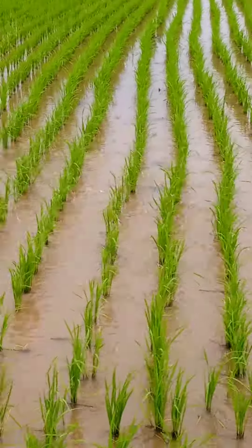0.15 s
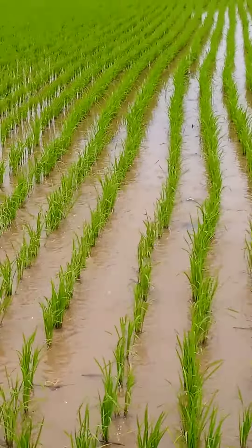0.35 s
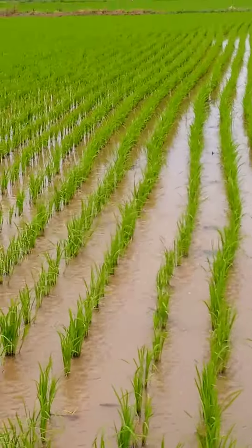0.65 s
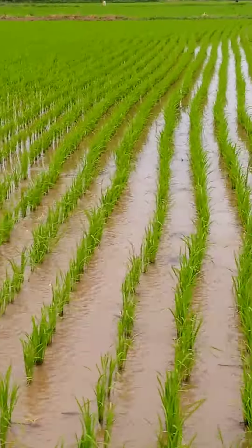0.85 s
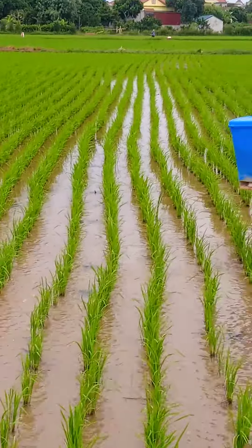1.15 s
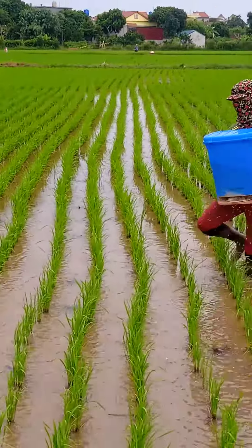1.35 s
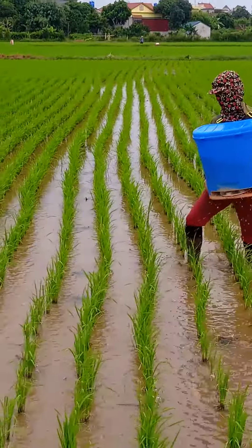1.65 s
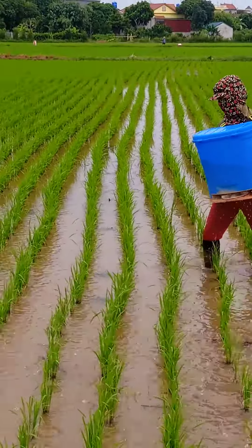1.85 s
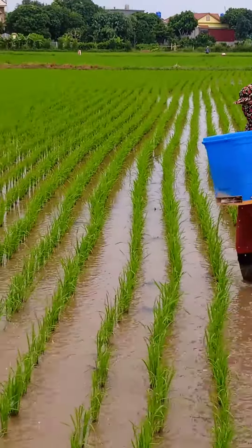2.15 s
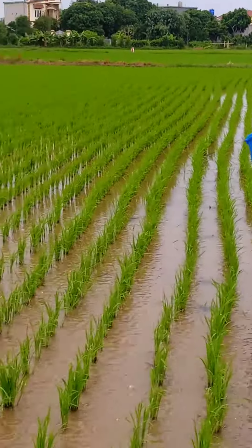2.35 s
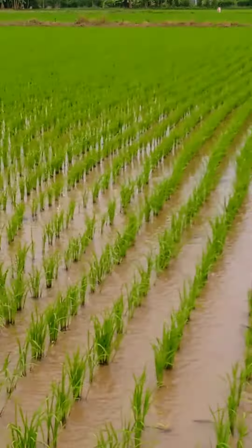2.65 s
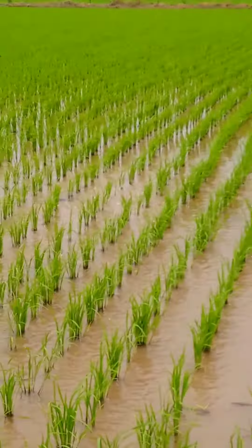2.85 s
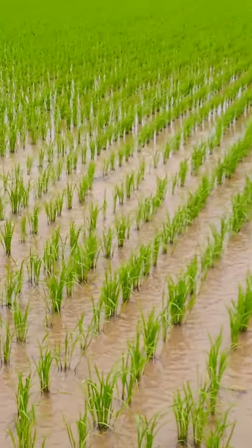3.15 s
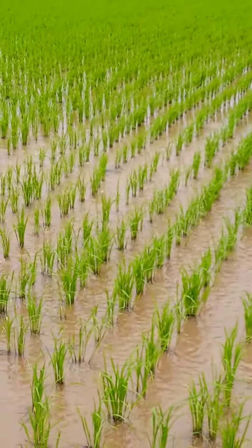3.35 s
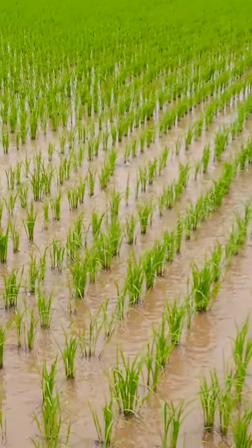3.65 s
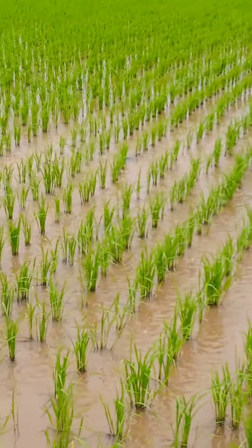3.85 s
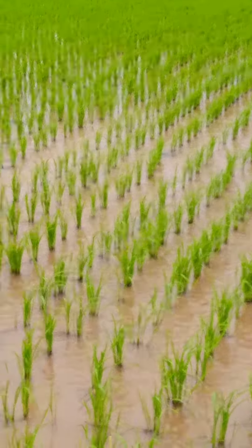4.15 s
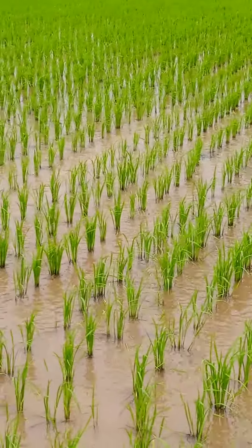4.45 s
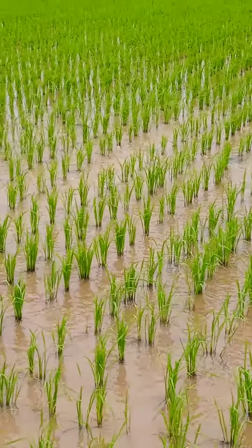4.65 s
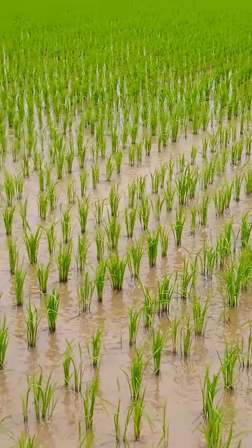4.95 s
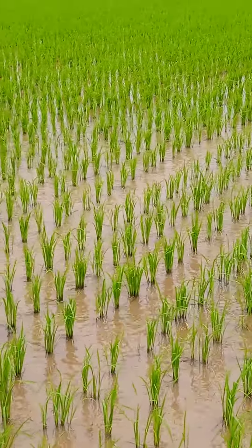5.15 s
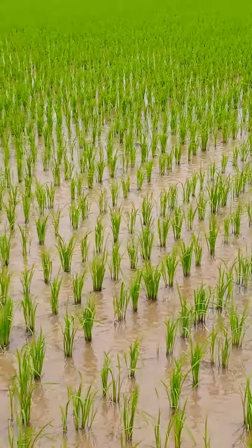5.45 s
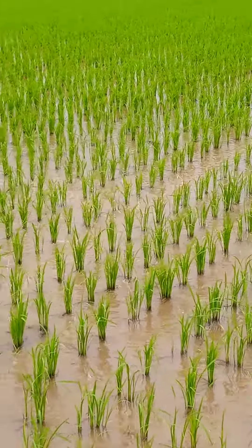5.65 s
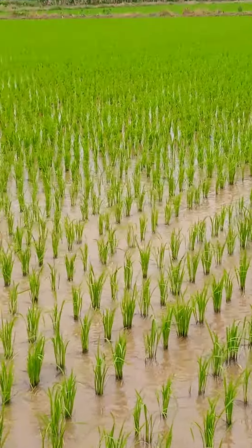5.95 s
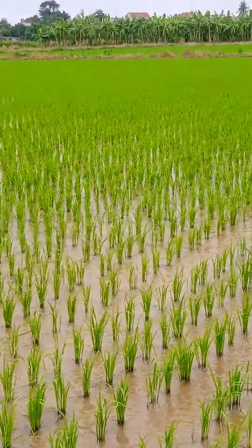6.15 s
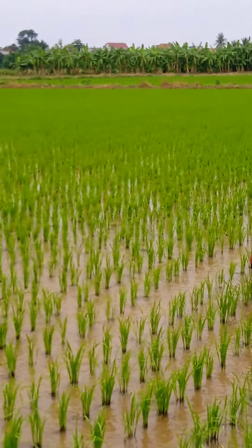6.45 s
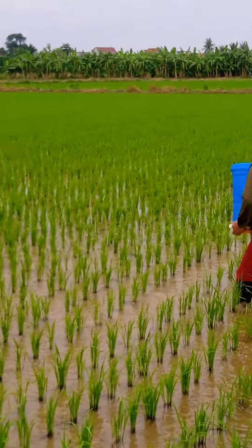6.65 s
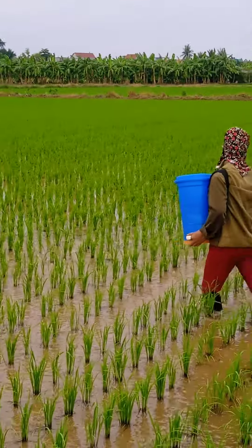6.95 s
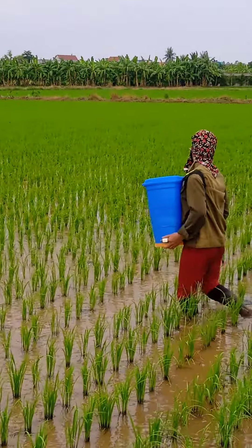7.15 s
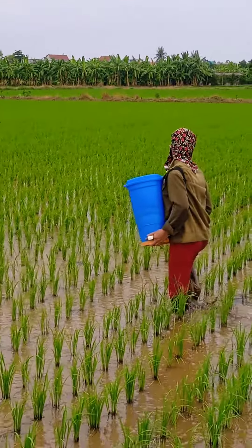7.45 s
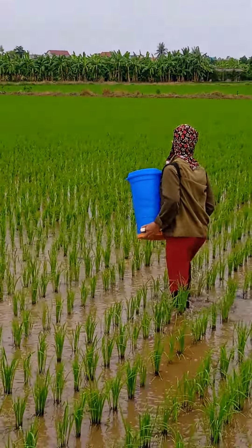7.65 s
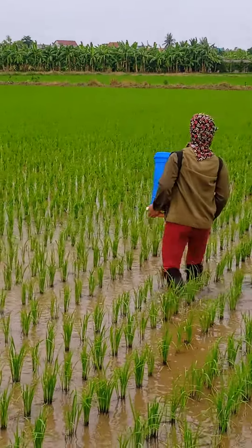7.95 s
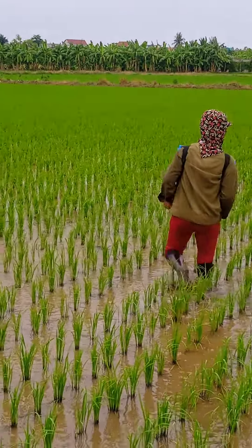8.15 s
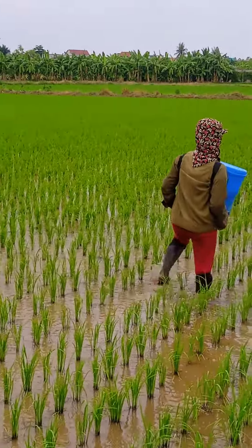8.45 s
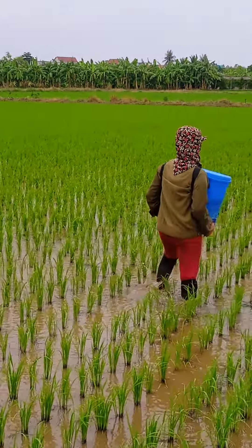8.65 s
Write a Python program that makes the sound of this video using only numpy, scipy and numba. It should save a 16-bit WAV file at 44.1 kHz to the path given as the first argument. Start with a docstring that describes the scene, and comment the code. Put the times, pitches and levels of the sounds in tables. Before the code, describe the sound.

A grainy, whirring rattle is already running at 0 s: thousands of granules tick off a spinning spreader disc, throbbing about 24 times a second and ringing a plastic hopper and chute. Its midrange tone is hollow and its treble hissy, with colour gliding as the carrier turns. Soft boot plops occur in the first second over faint sloshing and bubbling paddy water. From 1 to 3 s low wind bumps the phone microphone, while small knots of granules crackle and the feed briefly hitches. Plops cluster around 3.5 s; the rattle dips near 4.3 s, then returns strongly around 5 s. From 6 s it fades and dulls, recovering slightly about 7 to 7.7 s as more watery steps are heard. After 8 s the spreader is weak and distant, and gusts thicken, with the hardest low thump near 8.7 s. Open outdoor space, without room echo.

```python
"""A battery spreader carried across a flooded paddy, heard by a phone in a light breeze.
From the start granules tick off the disc, ring hopper and chute and throb 24 times a second; water sloshes
in shaped noise and boots plop in short tone bursts. Low-noise wind runs throughout, with buffets from 1 to 3 s;
knots of granules start at 1 s. The rattle's colour shifts with the carrying pose and it fades from 6 s.
The hardest buffets, brief low tone bursts, come last, near 8.7 s."""
import sys
import numpy as np
from scipy import signal
from scipy.fft import rfft, irfft, next_fast_len
from scipy.io import wavfile
from scipy.ndimage import uniform_filter1d
from numba import njit

SR = 44100
rng = np.random.default_rng(int(sys.argv[2]) if len(sys.argv) > 2 else 0)


def pcm_store(signal):
    """Save signal as 16-bit PCM."""
    levels = np.round(np.clip(np.atleast_2d(signal), -1, 1) * 32767)
    wavfile.write(sys.argv[1], SR, levels.astype(np.int16).T)


N = 388960


def undb(db):
    """dB to gain."""
    return 10 ** (np.asarray(db) / 20)


def unit(x):
    """Scale to rms 1."""
    return x / np.sqrt(np.mean(x ** 2))


def curve(table):
    """Interpolate each column after time_s over all samples."""
    time_s, *columns = np.transpose(table)
    return [np.interp(np.arange(N) / SR, time_s, column) for column in columns]


def colour(x, points):
    """Shape the spectrum by (freq_hz, gain_db) points, -99 dB outside them."""
    freq_hz, gain_db = np.transpose(points)
    size = next_fast_len(N)
    log_axis = np.log(np.fft.rfftfreq(size, 1 / SR) + 1)
    gain = undb(np.interp(log_axis, np.log(freq_hz), gain_db, -99, -99))
    return irfft(rfft(x, size) * gain, size)[:N]


def walk(rate_hz):
    """Random levels held 1 / rate_hz and smoothed twice; rms near 1."""
    hold = int(SR / rate_hz)
    steps = np.repeat(rng.standard_normal(N // hold + 1), hold)
    slewed = uniform_filter1d(uniform_filter1d(steps, hold), hold)
    return unit(slewed[:N])


def flicker(rate_hz, slowest_s=0.15):
    """A walk without its slow part."""
    fast = walk(rate_hz)
    return fast - uniform_filter1d(fast, int(SR * slowest_s))


def bursts(rows):
    """Tone under a bell envelope per (middle_s, peak_db, pitch_hz, length_s); 0 Hz gives the bare bell."""
    half = SR // 20
    out, t = np.zeros(N + SR), np.arange(-half, half) / SR
    for middle_s, peak_db, pitch_hz, length_s in rows:
        bell = np.exp(-(2.5 * t / length_s) ** 2)  # 1/e at 0.4 length_s either side
        start = int(middle_s * SR)
        out[start:start + len(t)] += undb(peak_db) * bell * np.cos(2 * np.pi * pitch_hz * t)
    return out[half:half + N]


def granules(flow_db, per_s=14000., scatter_db=3.5):
    """Dense impacts of uneven size and either sign, scaled by the flow."""
    sign = np.sign(rng.random(N) - .5) * (rng.random(N) < per_s / SR)
    return unit(sign * undb(flow_db + scatter_db * rng.standard_normal(N)))


# disc rotation: time_s, turns_so_far
DISC_TURNS = [(0.0, 0.21), (1.6, 38.84), (2.4, 57.94), (4.0, 96.73), (4.8, 116.46), (8.82, 213.25)]


def disc_flow_db(throb_db=1.38, surge_db=0.03, flutter_db=1.19):
    """Impact strength rises once per disc turn; the feed surges and flutters."""
    throb = throb_db * np.cos(2 * np.pi * curve(DISC_TURNS)[0])
    return throb + surge_db * flicker(25.) + flutter_db * flicker(130.)


# paths off guard plate, hopper and carrier: delay_s, gain_db
ECHO_PATHS = [(.0004, -16), (.0007, -15), (.0015, -14), (.0019, -14), (.0023, -14), (.0027, -16)]


def echoes(x, sway=.03):
    """Echo paths stretch as the carrier sways, drawing faint drifting ripples in the treble."""
    now = np.arange(N)
    out = x
    for delay_s, gain_db in ECHO_PATHS:
        delay = SR * delay_s * (1 + sway * walk(1.93))
        out = out + undb(gain_db) * np.interp(now - delay, now, x)
    return out


# unrung granule tick, spectrum shape: freq_hz, density_db_per_hz
TICK_COLOUR = [(700, -55), (1000, 3.5), (1500, -3.5), (3000, 9.5), (5500, -1), (5800, -6), (6100, -2.5),
               (8000, -1), (10000, -4), (13500, -12), (15600, -0.5)]
BARE_DB, BARE_SHADE_DB, BARE_TURN_DB = -18, -1, 0.08  # rms above 8 kHz before gains; change per pose unit


def bare_ticks(flow_db, knots, pose, patchy_db):
    """Direct granule clicks plus echoes, following flow and knots less strongly than the rings."""
    ticks = knots ** 0.44 * granules(0.26 * flow_db + patchy_db * flicker(90.))
    bare = echoes(colour(ticks, TICK_COLOUR))
    above = signal.sosfilt(signal.butter(6, 8000, "high", fs=SR, output="sos"), bare)
    return undb(BARE_DB + BARE_SHADE_DB * pose[0] + BARE_TURN_DB * pose[1]) * bare / np.std(above)


@njit
def ring(x, tune, width):
    """Two state-variable band-passes in series; tune = tan(pi Hz / SR), width = stage width / centre."""
    y, b, l, b2, l2 = np.empty(len(x)), 0., 0., 0., 0.
    for i in range(len(x)):
        g, k = tune[i], width[i]
        v = (b + g * (x[i] - l)) / (1 + g * (g + k))
        w = (b2 + g * (k * v - l2)) / (1 + g * (g + k))
        b, l = 2 * v - b, l + 2 * g * v
        b2, l2 = 2 * w - b2, l2 + 2 * g * w
        y[i] = k * w
    return y


# nearest ring stands out or drops, and glides: start_s, end_s, lift_db, from_hz, to_hz
RING_SPELLS = [(-.2, .26, 6, 4380, 4470), (-.2, .27, 4, 4850, 4720), (-.2, .25, 3.5, 5500, 5500),
               (-.2, .52, 0, 1530, 1566), (-.1, 0.34, 10.5, 2100, 2030), (0.248, 0.523, 6.5, 2030, 1900),
               (0.117, 0.322, 9.5, 6560, 6620), (.25, .55, 7, 5600, 5070), (0.247, .59, 2, 6430, 6750),
               (.33, .75, 4, 3160, 3120), (.35, .6, 4.5, 3780, 3660), (.4, 1.3, 1, 6870, 6700),
               (.55, .95, 3, 5250, 5050), (0.606, 1.26, 3, 2640, 2550), (.47, 1.15, 2.5, 1730, 1677),
               (0.877, 1.13, 4, 6560, 6560), (.97, 1.22, 3, 5450, 5300), (1.045, 1.283, 2, 4000, 4000),
               (1.15, 1.7, 2.5, 7400, 7200), (1.194, 2.045, 1.5, 1670, 1708), (1.244, 2.7, 5, 4900, 4820),
               (1.306, 2.0, 2.5, 3600, 3750), (2.05, 2.65, 0.5, 3600, 3400), (2.15, 2.5, -2.5, 1690, 1680),
               (2.2, 2.55, 4, 2320, 2270), (2.3, 2.65, 4.5, 7360, 7100), (2.5, 2.874, 4, 2920, 2920),
               (2.55, 3.6, 3.5, 5260, 5160), (2.948, 3.287, 3.5, 3090, 3140), (3, 3.3, 1.5, 4030, 3830),
               (3.157, 3.75, 0.5, 6100, 6350), (3.15, 3.9, 2.5, 4850, 4830), (3.497, 4.07, 2, 2870, 2980),
               (3.553, 4.31, -3.5, 1650, 1675), (3.6, 4.05, 2.5, 3170, 3130), (3.79, 4.1, 6, 1980, 2000),
               (4.3, 4.75, 1, 4760, 4780), (4.5, 4.98, 6, 3130, 3120), (4.7, 5.55, -8, 6960, 6900),
               (4.754, 5.45, 2.5, 1664, 1650), (4.8, 5.8, 3, 1244, 1260), (4.85, 5.5, 3.5, 4100, 4000),
               (4.85, 5.4, 3.5, 5200, 5160), (5.1, 5.6, 4, 4300, 4600), (5.303, 5.8, 3, 5450, 5620),
               (5.347, 5.9, 2, 3080, 3160), (5.44, 5.956, 9.5, 2000, 1944), (5.55, 6.1, 2.5, 4550, 4640),
               (5.56, 5.95, 3, 4860, 4820), (5.902, 6.9, 3, 1160, 1180), (5.997, 7.3, 2, 1644, 1658),
               (5.997, 6.557, 2, 2970, 2970), (6.15, 6.695, 4, 1920, 2040), (6.7, 7.7, 2.5, 5520, 5500),
               (6.7, 7.3, -2.5, 2070, 2140), (7, 7.95, 6, 6300, 6180), (6.99, 7.897, 1, 3090, 3160),
               (6.998, 8.05, -0.5, 2700, 2710), (7.103, 7.8, 1.5, 1170, 1120),
               (7.148, 7.8, 2.5, 4960, 5000), (7.2, 7.8, 3.5, 4636, 4550), (7.3, 7.582, -4, 1640, 1670),
               (7.5, 8.094, 3, 2190, 2160), (7.75, 8, 5, 3700, 3670), (8.044, 8.224, 7, 2680, 2640),
               (8.235, 8.526, 5.5, 2610, 2580), (8.3, 9, -8, 1220, 1200), (8.297, 9, -5, 1620, 1630),
               (8.447, 9, 6, 1940, 2010), (8.5, 8.8, 0, 3780, 3680), (8.5, 9, -3, 2720, 2700),
               (8.5, 9, -4, 4800, 4780)]
SPELL_FADE_S = 0.1


def spells(number, hz, rests_hz):
    """Pitch and extra dB of one ring once its spells are applied."""
    hz, db = hz.copy(), np.zeros(N)
    for start_s, end_s, lift_db, from_hz, to_hz in RING_SPELLS:
        if np.argmin(abs(np.log(rests_hz / from_hz))) == number:
            span = slice(max(int(start_s * SR), 0), min(int(end_s * SR), N))
            t = np.arange(span.start, span.stop) / SR
            on = np.clip(np.minimum(t - start_s, end_s - t) / SPELL_FADE_S, 0, 1)
            glide_hz = np.interp(t, [start_s, end_s], [from_hz, to_hz])
            hz[span] += on * (glide_hz - hz[span])
            db[span] += on * lift_db
    return hz, db


# hopper and chute resonances, before pose and spells: rest_hz, stage_width_hz, level_db,
# then per pose unit: shade_db, turn_db, tilt_db, shade_pitch_pct, turn_pitch_pct, tilt_pitch_pct
HOPPER_RINGS = [(1230, 268, -18, -1.5, 1.76, -0.41, -2.5, 1, 1),
                (1657, 133, -8.5, 0.26, 1.2, 0.62, -0.3, 0.65, 0.78),
                (2004, 117, -15.5, 4.5, 1, 1, -0.2, -0.5, -0.91),
                (2284, 210, -13.5, 3.5, 1, -1.6, -3, 0.5, 0.54),
                (2744, 166, -12, 1.9, 2.5, -0.29, 1.8, -3.5, 0.38),
                (2899, 270, -5.5, 1.05, -0.8, 0.85, 3, -1.3, 1.1),
                (3138, 203, -10.5, 2.1, -0.5, 0.51, 2.4, -0.4, 0.22),
                (3920, 540, -13, 0.5, 1.2, -1.6, -2.5, -4.5, -1.9),
                (4458, 210, -19.5, 2.8, -3, 0.13, -1, 2.6, 0.8),
                (4830, 370, -14, -0.2, -0.5, -0.21, 1, 0.3, 0.78),
                (5320, 330, -16.5, -1, 0, -0.33, .5, 1.5, 0.27),
                (6265, 620, -18, -3, 2, -0.46, -0.5, 0.9, 0.61),
                (6870, 260, -23.5, -0.5, 0.5, -0.025, -1.5, 3.3, -0.18)]


def hopper_rings(ticks, pose, patchy_db, wander=0.0062, focus=0.43):
    """Impacts excite plastic resonances whose pitch and level follow the pose."""
    body = np.zeros(N)
    rests_hz = np.array(HOPPER_RINGS)[:, 0]
    for number, (rest_hz, width_hz, level_db, *per_unit) in enumerate(HOPPER_RINGS):
        hz = rest_hz * (1 + np.dot(per_unit[3:], pose) / 100 + wander * walk(5.))
        hz, lift_db = spells(number, hz, rests_hz)
        focus_db = focus * np.maximum(lift_db, 0)  # a ring that stands out is also narrower
        width = width_hz * undb(-focus_db) / hz
        rung = undb(focus_db / 2) * ring(ticks, np.tan(np.pi * hz / SR), width)
        swell_db = np.dot(per_unit[:3], pose) + patchy_db * flicker(40.)
        body += undb(level_db + lift_db + swell_db) * unit(rung)
    return body


# bounce off the water: time_s, delay_ms, gain_db (before BOUNCE_COLOUR)
WATER_BOUNCE = [(0, 1.25, -18), (.25, 1.28, -8), (.55, 1.4, -17), (.8, 1.4, -1), (1.0, 2, -20),
                (1.3, 1.3, -23), (1.6, 1.3, -27), (2.4, 0.8, -15), (3.4, 1.34, -8), (4.4, 1.35, -17),
                (4.9, 1.35, -10), (5.25, 1.36, -10), (5.55, 1.28, -14), (5.9, 1.3, -23), (6.6, 1.2, -13),
                (7.4, 1.9, -29), (8.0, 1.62, -22), (8.82, 1.8, -13)]
# bounce filter, mostly treble: freq_hz, gain_db
BOUNCE_COLOUR = [(2600, -37), (4200, -6.5), (5500, -11.5), (5800, -8), (6100, -1), (16000, 1)]


def mirrored(x):
    """Water reflection, later as the hopper rides higher or nearer: gliding ripples."""
    delay_ms, gain_db = curve(WATER_BOUNCE)
    now = np.arange(N)
    bounced = colour(x, BOUNCE_COLOUR)
    return x + undb(gain_db) * np.interp(now - SR * delay_ms / 1000, now, bounced)


# feed dips: middle_s
FEED_GAPS = [.635, 1.099, 1.589, 1.621, 2.593, 2.671, 3.447, 4.441, 4.72, 5.268, 5.43, 5.635, 6.053, 7.964]
GAP_DB, GAP_LENGTH_S = -5, 0.0064
STUMBLE_DB, STUMBLE_RATE_HZ = -1, 60.  # dB per unit of flicker above 0.5; rate of the walk


def feed():
    """Rattle gain: brief dips plus smaller random hitches in the granule stream."""
    gaps = bursts([(middle_s, 0, 0, GAP_LENGTH_S) for middle_s in FEED_GAPS])
    stumbles = np.maximum(flicker(STUMBLE_RATE_HZ) - .5, 0)
    return undb(GAP_DB * gaps + STUMBLE_DB * stumbles)


# granules hitting the disc at once: middle_s, added_peak_db (re steady flow)
GRANULE_KNOTS = [(1.076, -3), (1.357, -1.5), (1.387, -8), (1.808, -8), (1.852, -13), (1.951, -14),
                 (2.112, -3), (2.162, -13), (2.395, 0), (3.346, -2), (3.676, -5), (4.135, -9), (4.244, 0),
                 (4.49, -4), (4.779, -12), (4.858, -14), (5.029, -11), (5.237, -3), (5.78, -8), (6.02, -6),
                 (6.162, 0), (6.445, -1), (6.557, -4), (6.61, -6), (7.99, -2)]
KNOT_LENGTH_S = 0.0098


def granule_knots():
    """Impact gain, swelling briefly where granules bunch."""
    return 1 + bursts([(middle_s, db, 0, KNOT_LENGTH_S) for middle_s, db in GRANULE_KNOTS])


# carrying pose: time_s, rattle_gain_db, shade, turn, tilt (unitless, around 0)
# shade = duller, hidden or further off; turn and tilt trade ring strengths, probably heading and lean
CARRY_POSE = [(0, -40.5, -1.4, -2.5, 1), (.2, -43.5, -0.88, -2.5, -1), (.55, -45, -0.41, 1, 0.5),
              (.8, -44.5, -1, -1, 1.9), (1.06, -42.5, -0.86, 1, 1.5), (1.37, -40.5, -0.12, 2, 0),
              (2.0, -40.5, -0.95, 1.5, 0.2), (2.4, -45.5, -0.012, 2, 0.2), (2.7, -47, -0.42, 1.2, 1),
              (2.95, -47, -0.41, -0.5, 1), (3.17, -43, 0.00085, -0.5, 1.5), (3.45, -42.5, -1.6, 0.7, -1.5),
              (3.78, -41, 0.13, -0.2, 1), (3.92, -45.5, -0.71, 0.5, 1.5), (4.3, -49, -0.11, 0.5, 0),
              (4.65, -46.5, -1.5, -1, 0), (4.8, -42.5, -0.89, -1.5, 2), (5.1, -41.5, -0.41, -0.1, -0.8),
              (5.4, -42, -0.36, -1.1, 0), (5.62, -42.5, -0.16, -1.3, 1.5), (5.8, -45, -0.62, -2.5, 2.5),
              (5.95, -47, -0.32, -1.2, 0.5), (6.3, -52.5, 0.41, 0.9, 0.6), (6.75, -54, 1.8, 1.5, 0.6),
              (7.07, -50.5, 1.76, -0.2, -0.5), (7.3, -49.5, 0.82, 0.3, 0.5), (7.7, -48, 1.7, -0.3, -0.5),
              (7.95, -52, 1.4, 1, -0.8), (8.2, -58, 1.3, 0.4, -1.2), (8.82, -55.5, 0.95, 0, -3)]


def spreader(patchy_db=1.17):
    """Granule impacts heard bare and through hopper and chute, gated by feed, reflected by water."""
    flow_db, knots = disc_flow_db(), granule_knots()
    gain_db, *pose = curve(CARRY_POSE)
    pose = np.array(pose)
    ticks = granules(flow_db) * knots
    body = bare_ticks(flow_db, knots, pose, patchy_db) + hopper_rings(ticks, pose, patchy_db)
    return mirrored(undb(gain_db) * feed() * body)


# legs through water: time_s, level_db (before lapping)
WADING_LEVEL = [(0, -67.5), (.6, -71), (.9, -66.5), (1.4, -71.5), (1.8, -68.5), (2.1, -68), (2.4, -67.5),
                (3.05, -67), (3.6, -67.5), (4.1, -70), (5.28, -66), (6.2, -71), (6.75, -72.5),
                (7.56, -66.5), (8.25, -72.5), (8.6, -69.5), (8.82, -71)]
# slosh and countryside, spectrum shape: freq_hz, density_db_per_hz
FIELD_COLOUR = [(110, -19), (180, -9.5), (252, -2.5), (322, -0.5), (388, -5), (684, -1.5), (824, -10),
                (1000, -3.5), (1300, -2), (2200, -120)]


def slosh(lap_db=2.0):
    """Sloshing water over the faint countryside: shaped noise with a lapping level."""
    water = unit(colour(rng.standard_normal(N), FIELD_COLOUR))
    return undb(curve(WADING_LEVEL)[0] + lap_db * walk(30.)) * water


BUBBLES_PER_S, BUBBLE_MAX_DB, BUBBLE_HZ, BUBBLE_MEAN_S = 16, -68, (217, 790), 0.025


def bubbles():
    """Air let go by the stirred mud: random tone blips, up to 8 dB weaker when longer."""
    when, pitch, size = rng.random((int(BUBBLES_PER_S * N / SR), 3)).T
    low_hz, high_hz = BUBBLE_HZ
    pitch_hz = low_hz * (high_hz / low_hz) ** pitch
    return bursts(zip(when * N / SR, BUBBLE_MAX_DB - 8 * size, pitch_hz, BUBBLE_MEAN_S * (.5 + size)))


# wind: time_s, level_db (before gusts and deep lift), deep_lift_db
WIND_LEVEL = [(0, -64, -10), (.4, -65, 4), (.8, -68, 2), (1.0, -68, 0), (1.07, -63, 0), (1.18, -68, 9),
              (1.26, -59, 7), (1.5, -55, -3), (1.65, -58.5, 1.5), (1.8, -67, 6), (1.88, -56, 9),
              (2.05, -58, 4), (2.17, -61.5, 5), (2.3, -56.5, 7), (2.5, -58.5, 6), (2.7, -64.5, -2),
              (2.9, -54, -3), (3.15, -64.5, 13), (3.3, -66, 15.5), (3.7, -61.5, 4), (3.9, -65, -21),
              (4.6, -68.5, -11), (5.6, -66.5, -2), (6.9, -66, -12), (7.05, -68, 11), (7.3, -68, 0),
              (7.7, -67.5, -12), (8.03, -56.5, 5), (8.12, -64, -4), (8.38, -65, -2), (8.44, -52, 1),
              (8.56, -53, 7), (8.63, -59, -3), (8.72, -42, -10), (8.82, -44, -9)]
# wind spectrum shape: freq_hz, density_db_per_hz
WIND_SHAPE = [(15, -46), (25, -29), (59, -1), (124, 1), (281, -18.5), (322, -15), (436, -35.5),
              (500, -25.5), (650, -66), (1100, -120)]


def wind_rumble(gust_db=2., deep_hz=75.0):
    """Turbulence on the microphone port: levelled low noise, re-gusted, its deep part lifted or cut."""
    level_db, deep_lift_db = curve(WIND_LEVEL)
    air = colour(rng.standard_normal(N), WIND_SHAPE)
    air /= np.sqrt(uniform_filter1d(air ** 2, SR // 8))
    deep = signal.sosfiltfilt(signal.butter(2, deep_hz, fs=SR, output="sos"), air)
    return undb(level_db + gust_db * walk(40.)) * (air + (undb(deep_lift_db) - 1) * deep)


# water closing round the boots: middle_s, peak_db, pitch_hz, length_s
BOOT_PLOPS = [(0.097, -56, 643, 0.0065), (0.207, -58, 695, 0.021), (0.23, -57, 660, 0.0091),
              (0.418, -53, 597, 0.014), (0.428, -46.5, 670, 0.0063), (0.886, -56.5, 600, .01),
              (0.937, -58, 560, .01), (2.1, -58, 655, .008), (3.049, -56, 666, 0.005),
              (3.104, -57.7, 664, 0.008), (3.472, -48.5, 693, 0.0087), (3.487, -54, 585, 0.017),
              (3.569, -55, 690, 0.013), (3.607, -56, 530, 0.013), (3.683, -54, 720, 0.0065),
              (3.742, -57, 600, 0.0093), (4.34, -56, 687, 0.0045), (4.427, -55, 720, 0.0064),
              (4.482, -54.5, 650, 0.0062), (5.189, -56, 660, 0.011), (5.245, -56, 630, 0.0081),
              (6.021, -54, 684, 0.0036), (6.365, -55.5, 660, 0.0089), (7.337, -59, 600, .012),
              (7.364, -58, 640, 0.023), (7.388, -58, 780, 0.0087), (7.48, -62, 720, .008),
              (7.612, -51.5, 694, 0.0056), (7.623, -55, 520, 0.0063), (7.664, -58, 876, 0.011),
              (7.719, -58, 600, 0.0062), (7.744, -51, 540, 0.0069), (7.824, -59, 480, 0.011),
              (8.574, -60, 650, .01)]


def plops(splash_db=-13.5):
    """Tone burst per plop, plus a longer, later splash of noise between about 350 and 1100 Hz."""
    envelope = bursts([(middle_s + length_s, peak_db + splash_db, 0, 3 * length_s)
                       for middle_s, peak_db, _, length_s in BOOT_PLOPS])
    band = signal.butter(2, [350., 1100.], "band", fs=SR, output="sos")
    spray = unit(signal.sosfilt(band, rng.standard_normal(N)))
    return bursts(BOOT_PLOPS) + envelope * spray


# strongest buffets: middle_s, peak_db, pitch_hz, length_s
WIND_BUFFETS = [(1.062, -48, 105, 0.031), (1.488, -39.5, 105, 0.013), (1.533, -47, 99.3, 0.013),
                (1.584, -40, 93, 0.012), (1.873, -47, 126, 0.012), (2.024, -43, 138, 0.0073),
                (2.296, -39, 110.2, 0.0092), (2.647, -46, 81.5, 0.026), (2.842, -45, 133, 0.011),
                (2.977, -39.5, 138, 0.02), (3.343, -36, 133, 0.0095), (7.095, -43, 90.5, 0.013),
                (8.051, -42, 112, 0.011), (8.412, -40, 117, 0.0079), (8.46, -43, 144, 0.0089),
                (8.488, -51, 102, 0.011), (8.515, -36, 136, 0.014), (8.678, -39, 118, 0.01),
                (8.704, -40, 282, 0.0068), (8.707, -27.5, 125.7, 0.019), (8.723, -32, 126, 0.012),
                (8.728, -46, 300, .007), (8.756, -50, 127, 0.0051), (8.79, -50, 270, .02),
                (8.794, -38, 144, 0.012)]


def buffets():
    """Wind thumps on the microphone: a few low cycles under a bell."""
    return bursts(WIND_BUFFETS)


def scene():
    """Everything at the one microphone."""
    water = slosh() + bubbles() + plops()
    return (spreader() + water + wind_rumble() + buffets())[None]


TOP_HZ = 15750


def record(dry):
    """The phone drops the deepest bass and cuts the top."""
    dry = signal.sosfilt(signal.butter(2, 40., "high", fs=SR, output="sos"), dry)
    return signal.sosfilt(signal.ellip(10, .2, 70, TOP_HZ, fs=SR, output="sos"), dry)


dry = scene()
out = record(dry)
pcm_store(out)
```